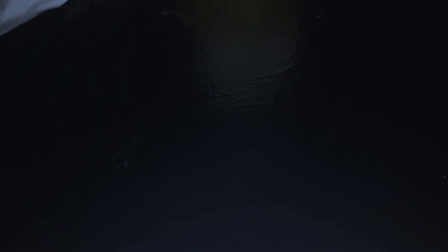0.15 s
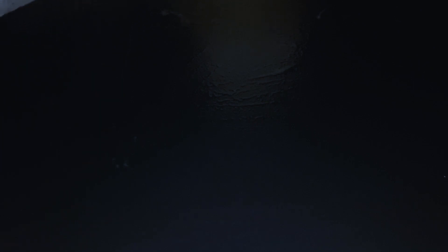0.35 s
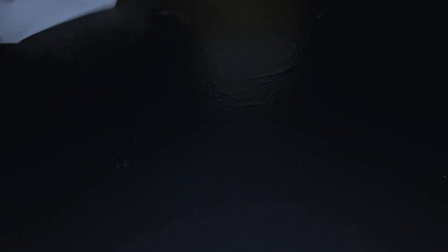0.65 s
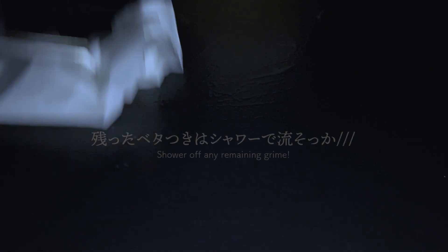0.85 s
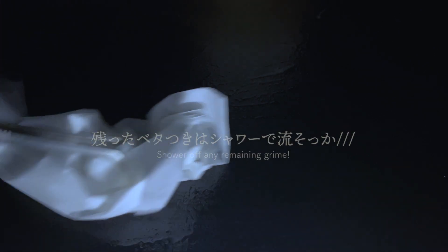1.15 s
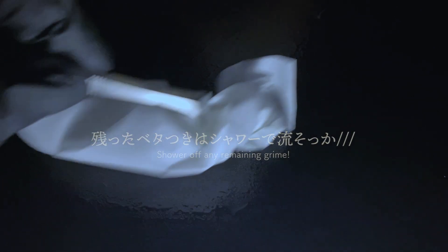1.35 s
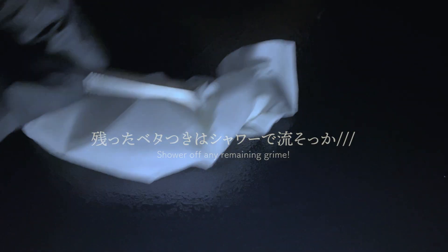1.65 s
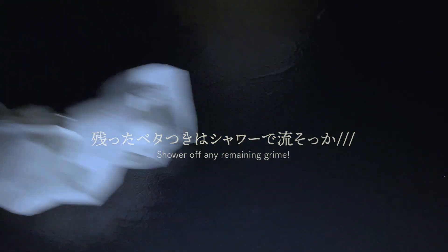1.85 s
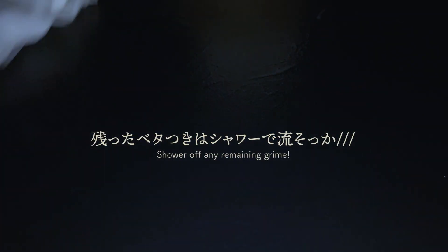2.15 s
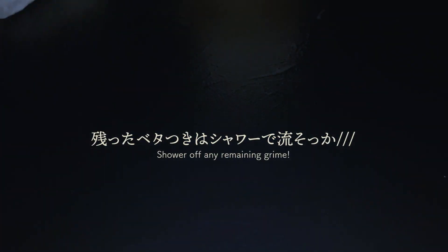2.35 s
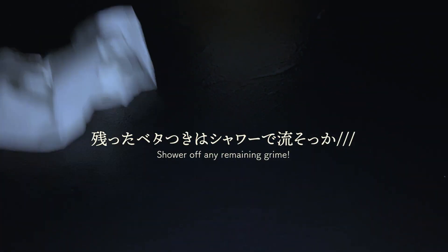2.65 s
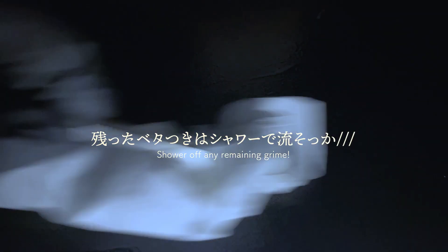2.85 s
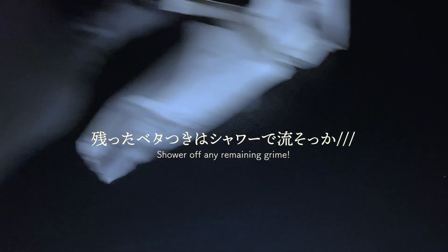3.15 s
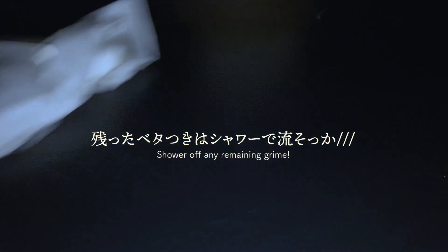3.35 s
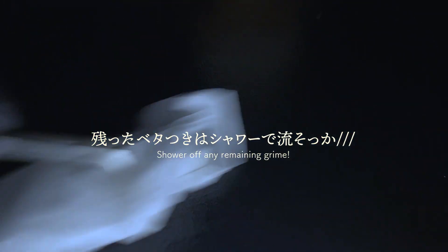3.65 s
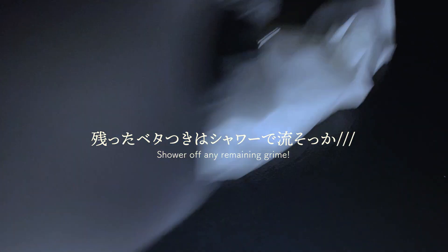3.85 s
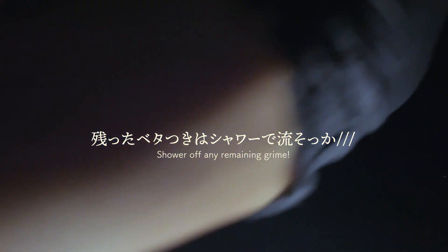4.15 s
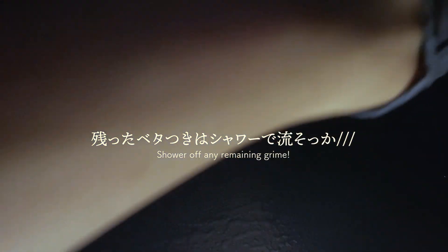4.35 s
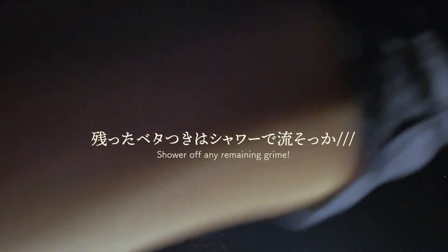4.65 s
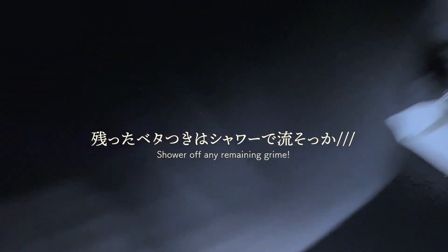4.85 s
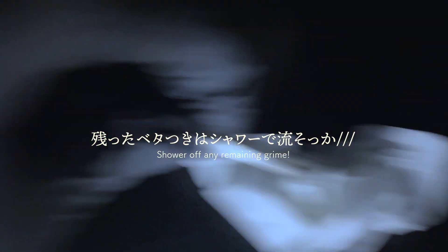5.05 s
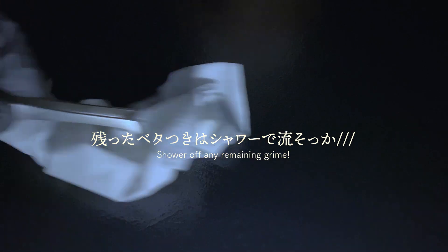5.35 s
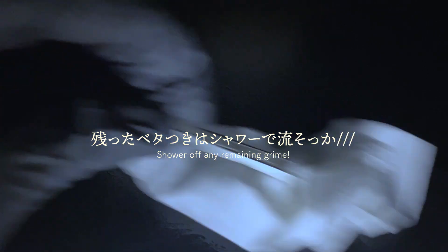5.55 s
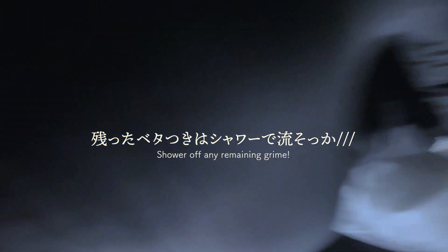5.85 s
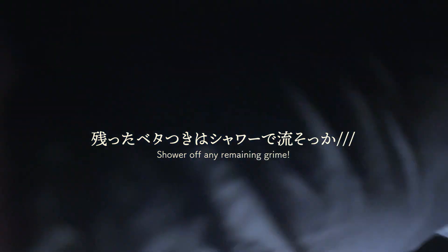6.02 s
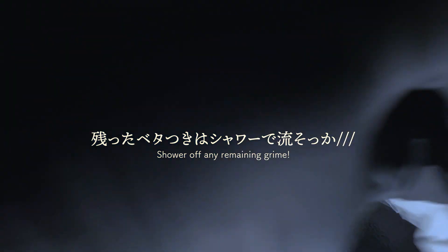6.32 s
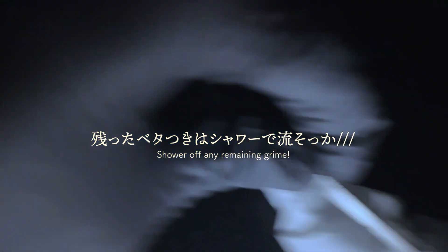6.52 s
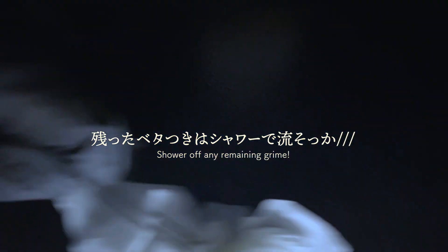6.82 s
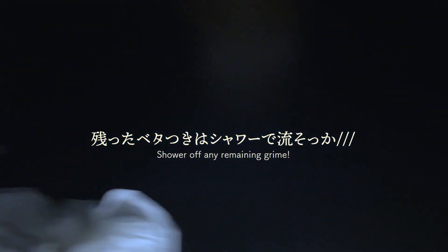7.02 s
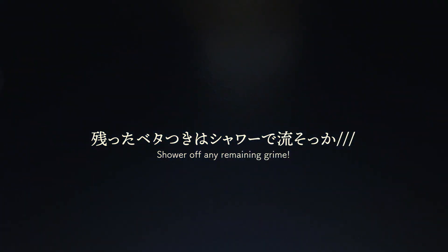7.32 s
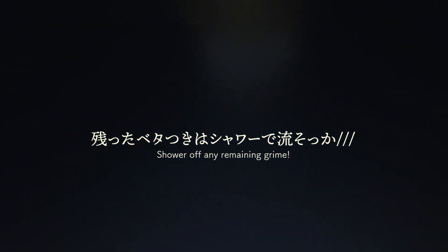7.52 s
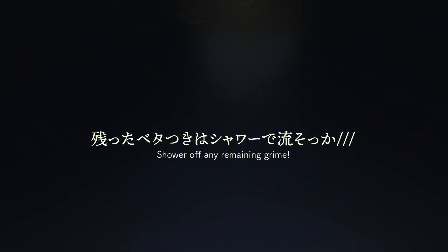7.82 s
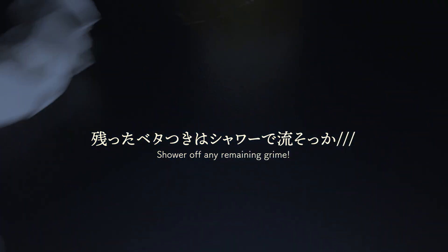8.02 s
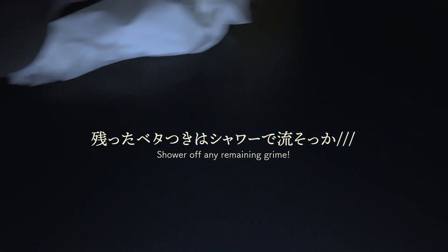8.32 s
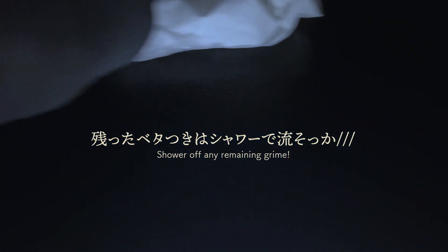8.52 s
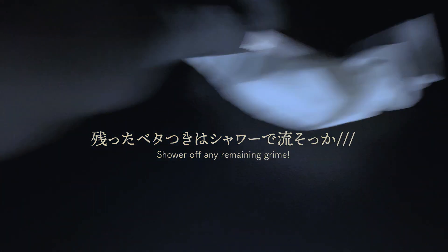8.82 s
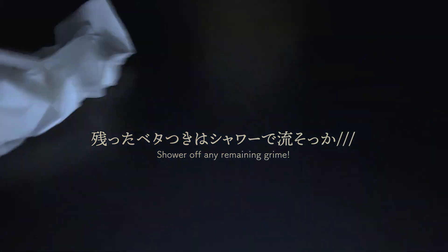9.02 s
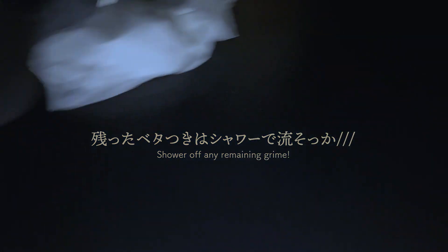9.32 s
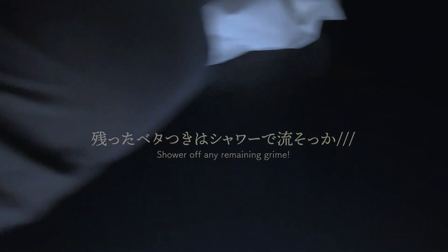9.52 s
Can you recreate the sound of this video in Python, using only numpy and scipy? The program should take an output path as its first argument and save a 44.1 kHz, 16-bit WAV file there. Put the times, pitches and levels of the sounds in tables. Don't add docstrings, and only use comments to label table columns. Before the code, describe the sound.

Close, rustling strokes of a stiff sheet hiss from left to right and back, dipping at turns, with little clicks and soft table thuds.

```python
import sys
import numpy as np
from scipy import signal
from scipy.fft import rfft, irfft, next_fast_len
from scipy.io import wavfile
from scipy.ndimage import uniform_filter1d, map_coordinates

SR = 44100
rng = np.random.default_rng(int(sys.argv[2]) if len(sys.argv) > 2 else 0)


def natural_amplitude(level_db):
    exponent = np.asarray(level_db, float) / 20
    return 10 ** exponent


def waveform_to_disk(signal):
    frames = np.transpose(np.atleast_2d(signal))
    scaled = np.clip(frames, -1, 1) * 32767
    samples = np.round(scaled).astype(np.int16)
    wavfile.write(sys.argv[1], SR, samples)


N = 426447

# start_s [s], speed_db [dB]
SPEED_CURVE = [(0, -33.5), (.3, -37), (.62, -33), (.91, -36.5), (1.2, -38), (1.75, -36.5), (2.05, -36.5),
               (2.5, -36.5), (2.75, -40), (3.3, -40.5), (3.85, -41), (4.45, -34.5), (5.1, -40),
               (5.8, -38.5), (6.7, -43.5), (7.9, -41), (8.5, -43), (9.67, -40.5)]
# start_s [s], weight_db [dB]
WEIGHT_CURVE = [(0, 0), (.4, 1.5), (.7, 3), (1.05, -1), (1.3, 0), (1.86, 1.5), (2.3, -2.5), (2.55, 2),
                (3.2, 4), (3.5, 1), (3.75, 5), (4.28, -4.5), (5.15, 0.5), (5.9, -3.5), (7.3, -7.5),
                (8.55, -4), (8.81, 4), (9.05, -6.5)]
# peak_s [s], swell_db [dB], approach_s [s], recovery_s [s]
HAND_LEANS = [
    (.46, 5.5, 0.092, 0.027),
    (.72, 7.5, 0.16, 0.14),
    (2.63, 8, 0.22, 0.16),
    (3.42, 2, .1, .06),
    (4.42, 5.5, 0.18, 0.16),
    (5.04, 6, 0.033, 0.016),
    (7.48, 3.5, 0.045, .03),
    (2.05, 4.5, 0.14, 0.064),
]


def unit(x):
    return x / np.sqrt(np.mean(x ** 2, axis=-1, keepdims=True) + 1e-20)


def curves(rows):
    s, *cols = np.transpose(rows)
    return [np.interp(np.arange(N) / SR, s, c) for c in cols]


def swells(table):
    t = np.arange(N) / SR
    total_db = np.zeros(N)
    for s, db, before, after in table:
        approach = np.clip(1 - (s - t) / before, 0, 1) ** 0.91
        recovery = np.exp(-np.abs(t - s) / after)
        total_db += db * np.where(t < s, approach, recovery)
    return total_db


def wobble(rate):
    knots = rng.standard_normal(int(N * rate / SR) + 4)
    return map_coordinates(knots, [np.arange(N) * rate / SR])


def filtered(x, response):
    m = next_fast_len(N + 8192)
    return irfft(rfft(x, m) * response(np.fft.rfftfreq(m, 1 / SR)), m)[..., :N]


def coloured(x, points):
    f, db = np.transpose(points)
    return unit(filtered(x, lambda hz: natural_amplitude(np.interp(np.log(hz + 1), np.log(f + 1), db))))


def tilted(x, points, tilt_db, bright):
    dull = coloured(x, [(f, db - tilt_db * np.log2(f)) for f, db in points])
    keen = coloured(x, [(f, db + tilt_db * np.log2(f)) for f, db in points])
    bright = np.clip(bright, 0, 1)
    return (1 - bright) * dull + bright * keen


def ears(db, pan_db):
    ratio = natural_amplitude(pan_db)
    return 2 * natural_amplitude(db) * np.array([ratio, 1 + 0 * ratio]) / np.sqrt(1 + ratio ** 2)


def pair(alike):
    common, *own = rng.standard_normal((3, N))
    return np.sqrt(alike) * common + np.sqrt(1 - alike) * np.array(own)


def room_rumble():
    # pitch_hz [Hz], level_db [dB]
    rumble_colour = [(18, -60), (30, -23), (47, -0.5), (57, -10.5), (70, -2), (95, -9.5), (112, -15),
                     (150, -9), (172, -12), (200, -8), (270, -19.5), (400, -120)]
    side_db = np.array([[-2.2], [2.2]])
    return natural_amplitude(-57.5 + wobble(4.4)) * natural_amplitude(side_db) * coloured(pair(0.95), rumble_colour)


def room_hum():
    pitch_hz = 47.9 + 1.85 * wobble(5)
    level_db = -61.5 + 2.1 * wobble(3.3) + np.array([[-2.2], [2.2]])
    return natural_amplitude(level_db) * np.sin(2 * np.pi * np.cumsum(pitch_hz) / SR)


def room_air():
    # pitch_hz [Hz], level_db [dB]
    air_colour = [(300, -120), (700, -12), (3000, 0.5), (8000, -14), (16000, -24)]
    return natural_amplitude(-56.5) * coloured(pair(0.066), air_colour)


def table_thrum():
    # pitch_hz [Hz], level_db [dB]
    thrum_colour = [(60, -120), (110, -6), (170, -1), (230, -3.5), (300, -1), (450, -4.5), (800, -36),
                    (1500, -120)]
    speed_db, weight_db = curves(SPEED_CURVE)[0], curves(WEIGHT_CURVE)[0]
    level_db = -59.5 + 0.21 * (speed_db - speed_db.mean()) + 0.26 * weight_db + swells(HAND_LEANS)
    side_db = np.array([[-.6], [.6]])
    return natural_amplitude(level_db) * natural_amplitude(side_db) * coloured(pair(0.36), thrum_colour)


def knocks(table, cycles, crack, gain_db):
    out, t = np.zeros((2, N + SR)), np.arange(SR // 10) / SR
    for s, db, pan_db, hz in table:
        fade = np.exp(-t * hz / cycles) * (1 - np.exp(-t * hz * 2.5))
        grit = unit(uniform_filter1d(rng.standard_normal((2, len(t))), 1 + int(SR / hz / 2)))
        ring = fade * (1 + crack * grit) * np.sin(2 * np.pi * hz * t + crack * grit)
        ring = ring / np.abs(ring).max(axis=1, keepdims=True)
        ring = ring * natural_amplitude(db + gain_db + np.minimum(0, [[pan_db], [-pan_db]]))
        for ear, way in enumerate((-1, 1)):
            late_s = max(way * pan_db, 0) * 3e-5
            start = round((s - .75 / hz + late_s) * SR)
            out[ear, start:][:len(t)] += ring[ear]
    lowest_hz = min(row[3] for row in table) / 2
    return filtered(out[:, :N], lambda f: (1j * f / (lowest_hz + 1j * f)) ** 2)


def table_bumps():
    # peak_s [s], level_db [dB], left_right_db [dB], pitch_hz [Hz]
    bumps = [
        (2.545, -42, 7, 370),
        (2.61, -39, 2, 217),
        (2.675, -43, 2, 178),
        (2.75, -55, 2, 171),
        (4.5, -45, -8, 264),
        (4.56, -38, -12, 164),
        (5.04, -49, -1, 202),
        (5.045, -43, 3, 378),
    ]
    return knocks(bumps, cycles=4.5, crack=0.43, gain_db=2.5)


def fold_snaps():
    # peak_s [s], level_db [dB], left_right_db [dB], pitch_hz [Hz]
    snaps = [(.4048, -13, 15, 5030), (.4072, -14, 12, 4500), (.6075, -16, 11, 4200), (.8812, -18, 6, 3900),
             (1.4154, -27, -4, 4500), (1.5424, -28, -6, 4800), (1.5705, -28, -1, 4800),
             (1.651, -22, 9, 5000), (1.6891, -21, 9, 4200), (1.7, -20, 6, 4500), (1.7855, -18, 3, 5600),
             (1.8184, -18, 2, 6300), (2.0113, -18, 17, 4800), (2.0354, -18, 14, 4600),
             (2.0859, -17, 18, 4800), (2.1991, -18, 19, 5000), (2.3553, -18, 13, 4400),
             (3.2222, -22, 8, 4500), (4.3567, -13, -25, 4800), (4.3735, -17, -20, 4400),
             (4.4166, -14, -22, 4830), (4.428, -18, -20, 4700), (4.549, -17, -10, 5240),
             (5.2735, -31, 0, 5300), (5.7505, -21, -11, 4400), (5.788, -21, -11, 5090),
             (6.056, -23, -8, 5240), (6.0662, -21, -12, 5000), (6.078, -20, -14, 4300),
             (6.3796, -21, -12, 4940), (8.617, -24, 2, 6200), (8.7955, -31, -4, 4400),
             (8.8522, -31, -5, 4500), (8.9542, -29, 9, 4800), (9.136, -28, 3, 6200),
             (9.6546, -26, -11, 4800)]
    # peak_s [s], level_db [dB], left_right_db [dB], pitch_hz [Hz]
    flicks = [(.2202, -24, 19, 9250), (.2293, -25, 20, 9000), (.2585, -27, 15, 9000),
              (.2864, -29, 18, 9000), (.3336, -22, 22, 9000), (.9016, -26, 9, 9300), (1.0365, -30, 2, 9250),
              (1.6358, -31, 4, 9300), (1.7855, -29, 7, 9700), (1.8184, -27, 8, 8500),
              (2.3134, -30, 20, 9000), (4.4254, -25, -25, 11900), (4.5492, -25, -8, 10500),
              (4.6109, -32, 2, 9500), (5.0331, -31, -2, 9350), (5.2705, -35, 18, 9610),
              (5.9526, -32, -3, 9240), (6.0009, -31, -13, 9300), (6.0653, -33, -2, 9260),
              (6.3796, -28, -16, 9300), (7.4542, -26, 12, 9300), (8.8512, -38, 5, 9500),
              (8.939, -35, 13, 9500), (8.9991, -34, 16, 10000)]
    # peak_s [s], level_db [dB], left_right_db [dB], pitch_hz [Hz]
    ticks = [(.1127, -17, 16, 2900), (.2045, -15, 22, 3000), (.2795, -22, 14, 1900),
             (1.3519, -25, -5, 3300), (1.6288, -25, 4, 3200), (1.819, -21, 5, 3000),
             (2.0213, -23, 10, 3250), (2.1107, -20, 16, 3100), (2.371, -20, 10, 2720), (2.79, -27, 5, 2800),
             (2.9676, -19, -7, 3300), (3.2227, -25, 9, 3000), (4.3569, -23, -20, 3000),
             (5.3707, -25, -8, 3600), (5.3732, -28, 0, 2600), (6.3798, -27, -14, 2900),
             (8.7952, -29, -10, 2900), (8.8351, -32, -8, 2800), (9.1383, -33, 4, 3000)]
    # peak_s [s], level_db [dB], left_right_db [dB], pitch_hz [Hz]
    slaps = [(1.0365, -32, 2, 1500), (1.6873, -29, 3, 1500), (4.4254, -27, -18, 1710),
             (5.3723, -27, -7, 1400), (5.375, -31, -7, 750), (5.7889, -32, -9, 1500),
             (6.3007, -27, -17, 1150), (6.3796, -35, -9, 1510), (7.27, -47, 0, 910),
             (8.4351, -36, -6, 1800), (8.7973, -40, -2, 1400), (9.0113, -40, 10, 1110),
             (9.1023, -46, 1, 1110)]
    thin = knocks(snaps, cycles=3.5, crack=.22, gain_db=1.5) + knocks(flicks, cycles=5, crack=.4, gain_db=1.5)
    thick = knocks(ticks, cycles=2.5, crack=.35, gain_db=2.5) + knocks(slaps, cycles=2.2, crack=.8, gain_db=3)
    return thin + thick


def fibres(pan_db, spread_db, sparse, burst_s, alike, lag_per_db):
    size_db = spread_db * np.minimum(rng.exponential(size=(3, N)), 3.6)
    starts = (rng.random((3, N)) < .006) * natural_amplitude(size_db)
    bursts = signal.lfilter([1], [1, -np.exp(-1 / (burst_s * SR))], starts)
    slips = unit(rng.standard_normal((3, N)) * (1 + sparse * unit(bursts)))
    lag = np.clip(lag_per_db * pan_db, -18, 18)
    n = np.arange(N)
    common = np.array([np.interp(n + way * lag, n, slips[0]) for way in (1, -1)])
    return np.sqrt(alike) * unit(common) + np.sqrt(1 - alike) * slips[1:]


def patchy(x, patchy_db, bins, frames):
    z = signal.stft(x, nperseg=512)[2]
    field = rng.standard_normal(z.shape)
    for _ in range(2):
        field = uniform_filter1d(uniform_filter1d(field, bins, axis=1), frames, axis=2)
    return signal.istft(z * natural_amplitude(patchy_db * field / field.std()), nperseg=512)[1][:, :N]


def creased(x):
    quick = patchy(x, 0.85, bins=5, frames=9)
    return patchy(quick, 0.34, bins=3, frames=70)


def fibre_slips(pan_db):
    fast = np.array([wobble(150), wobble(150)])
    tremble = natural_amplitude(.45 * wobble(12) + .7 * wobble(40) + .4 * fast)
    coarse = fibres(pan_db, spread_db=2.5, sparse=0.34, burst_s=0.00048, alike=0.17, lag_per_db=2.08)
    fine = fibres(pan_db, spread_db=7.5, sparse=0.15, burst_s=0.00032, alike=0.089, lag_per_db=2.5)
    return creased(tremble * coarse), creased(tremble * fine)


def hem_scuff(coarse, level_db, pan_db):
    # pitch_hz [Hz], level_db [dB]
    scuff_colour = [(250, -120), (420, -19), (650, -1), (900, -2), (1150, -4), (1600, -9.5), (2500, -120)]
    return ears(level_db - 21, pan_db) * coloured(coarse, scuff_colour)


def sheet_drag(coarse, level_db, pan_db, bright):
    # pitch_hz [Hz], level_db [dB]
    drag_colour = [(600, -120), (950, -21.5), (1300, -6), (1800, 2.5), (2300, 1), (2800, 0.5), (3400, -8),
                   (4500, -44), (6000, -120)]
    return ears(level_db - 8, pan_db) * tilted(coarse, drag_colour, 6.5, bright)


def ear_hiss(coarse, fine, level_db, pan_db, bright):
    # pitch_hz [Hz], level_db [dB]
    hiss_colour = [(1500, -120), (2400, -27.5), (3250, -8.5), (3650, -1), (4050, 1), (4900, 1),
                   (6000, -1.5), (7200, -13), (9000, -41), (12000, -120)]
    return ears(level_db, pan_db) * tilted(0.62 * coarse + 0.78 * fine, hiss_colour, 8.5, bright)


def sheet_sheen(fine, level_db, pan_db):
    # pitch_hz [Hz], level_db [dB]
    sheen_colour = [(4500, -120), (6500, -6), (8000, -3), (9500, -2.5), (11000, -8), (12500, -16),
                    (16000, -120)]
    return ears(level_db - 9.5, pan_db) * coloured(fine, sheen_colour)


def fold_glint(fine, level_db, pan_db):
    # pitch_hz [Hz], level_db [dB]
    glint_colour = [(8000, -120), (11000, -12), (12300, -3.5), (14000, -3), (15500, -9.5), (16000, -14),
                    (18000, -120)]
    # peak_s [s], crispness_db [dB], approach_s [s], recovery_s [s]
    crackles = [
        (1.07, -6, .04, .05),
        (1.25, 5, .1, .06),
        (2.3, 0, .05, .05),
        (7.46, 4, .1, .03),
        (7.6, -7, .04, .1),
        (8.4, -7, .12, .12),
        (8.73, 5, .15, .012),
        (8.8, -3, .03, .08),
        (8.95, 4, .015, .04),
    ]
    return ears(level_db - 20 + swells(crackles), 2.1 * pan_db) * coloured(fine, glint_colour)


def table_bounce(x):
    # start_s [s], left_delay_ms [ms], left_share [0-1], right_delay_ms [ms], right_share [0-1]
    bounce = [(0, 0.57, 0.21, 0.88, .15), (.55, 0.6, 0, 1.5, 0.00056), (1, 0.49, 0.19, 0.75, 0.21),
              (1.45, 0.59, 0, 0.71, 0.11), (1.7, 0.46, 0, 0.74, 0.2), (2.1, 0.61, 0, 0.95, 0.19),
              (2.35, 0.53, 0.26, 0.92, 0.081), (2.8, 0.56, 0.016, 0.76, 0.17),
              (3.3, 0.72, 0.18, 0.63, 0.042), (3.5, 0.78, 0.15, 0.73, 0.22), (3.9, 0.66, 0.4, 0.94, 0.14),
              (4.25, .78, .3, 0.84, 0), (4.4, 0.63, 0.045, 0.83, 0), (4.75, 0.76, 0.51, 1.2, 0.099),
              (5.1, 0.56, 0.13, 0.67, 0.2), (5.3, 0.56, .25, 0.96, 0), (5.9, .7, 0.36, .72, 0),
              (6.4, 0.63, .3, .7, 0), (6.62, 0.54, 0, .76, .2), (6.7, .76, .35, 1.2, 0.0024),
              (6.85, 0.78, .5, 1.09, 0.37), (7.15, 0.7, 0.41, 1.11, 0.35), (7.4, 0.63, 0.36, .62, 0.22),
              (7.5, 0.6, .1, .85, 0.01), (7.7, 0.62, 0.014, 1.6, .25), (8.1, 0.64, 0.18, 1.3, 0.097),
              (8.55, 0.75, 0.46, .85, 0.15), (8.85, 0.6, 0, .8, 0), (9.05, 0.47, 0.21, .8, .05),
              (9.3, 0.76, 0.15, .75, 0), (9.67, 0.63, .4, 0.97, .1)]
    left_ms, left, right_ms, right = curves(bounce)
    late = np.arange(N) - SR * np.array([left_ms, right_ms]) / 1000
    share = np.clip([left, right], 0, .7)
    copy = np.array([map_coordinates(ear, [at], order=3) for ear, at in zip(x, late)])
    return (x + share * copy) / np.sqrt(1 + share ** 2)


def ear_notch(x):
    # start_s [s], centre_hz [Hz], depth_db [dB]
    notch_path = [
        (3.6, 10500, -2),
        (3.85, 10500, -5),
        (4.1, 10000, -2),
        (4.25, 8500, -2),
        (4.4, 8800, -12),
        (4.48, 10000, -13),
        (4.65, 10500, -6),
    ]
    hz, t, z = signal.stft(x[1], SR, nperseg=512)
    s, centre_hz, depth_db = np.transpose(notch_path)
    off_centre = (hz[:, None] - np.interp(t, s, centre_hz)) / 900
    dip_db = np.interp(t, s, depth_db) * np.exp(-off_centre ** 2)
    return np.array([x[0], signal.istft(z * natural_amplitude(dip_db), SR, nperseg=512)[1][:N]])


def sheet_sweep():
    # start_s [s], left_right_db [dB]
    place = [(0, 9.5), (.62, 9.5), (.8, 0.5), (1.8, 1), (2.05, 10.5), (2.4, 10.5), (2.85, -1.5), (3.35, 6),
             (3.8, -4), (4.44, -28), (5.17, 1), (5.5, -1), (6.0, -19.5), (6.75, -3), (7.7, 11), (8.7, -6.5),
             (9.05, 5.5), (9.67, -10.5)]
    # peak_s [s], left_right_db [dB], approach_s [s], recovery_s [s]
    swerves = [
        (2.26, 2, .1, .05),
        (2.99, -7, 0.083, 0.12),
        (3.23, 2, 0.03, .02),
        (4.04, 2.5, .15, 0.086),
        (4.44, -7, .1, 0.046),
        (5.68, -1, .1, .1),
        (6.06, 9, .03, 0.036),
        (7.41, -4, 0.17, 0.044),
        (8.89, 3, .1, 0.045),
    ]
    # peak_s [s], change_db [dB], approach_s [s], recovery_s [s]
    turns = [(.349, -8, 0.057, 0.0049), (.4, 4, 0.095, 0.12), (.52, 0, 0.095, 0.044),
             (.73, 0, 0.057, 0.044), (3.89, -1, 0.053, 0.033), (4.85, 0.5, 0.094, 0.032),
             (5.54, -1.5, 0.035, 0.044), (6.35, 2.5, 0.089, 0.1), (6.93, -0.5, 0.053, 0.1),
             (1.03, -4, 0.066, 0.26), (1.5, -6, 0.15, 0.19), (1.62, -3.5, 0.12, 0.0089),
             (1.69, 1.5, 0.036, .03), (1.75, -2, .04, 0.014), (2.33, -5.5, 0.12, 0.012),
             (2.345, 3, .006, 0.24), (2.99, 3, 0.1, 0.025), (3.04, -3, 0.015, 0.17), (3.39, 1.5, 0.1, .08),
             (3.58, -1.5, 0.055, 0.043), (3.72, 1.5, 0.11, 0.08), (5.242, -19, 0.0086, 0.031),
             (5.262, -11.5, 0.1, 0.011), (5.3, -5.5, 0.024, 0.13), (6.05, -3.5, 0.077, .004),
             (6.06, 5.5, .006, 0.045), (6.25, 1, 0.086, 0.034), (7.24, 2, 0.1, 0.062),
             (7.51, -0.5, 0.072, 0.017), (7.58, -15, 0.091, 0.062), (7.7, -5, 0.1, 0.029),
             (8.72, 0.5, 0.11, 0.011), (8.755, -6.5, 0.0099, 0.1), (8.905, -12, 0.089, 0.021),
             (9.02, -5.5, 0.063, 0.051), (9.21, -2.5, 0.093, 0.19), (7.542, -9, .015, .025)]
    # peak_s [s], weight_db [dB], approach_s [s], recovery_s [s]
    presses = [(1.22, 3.5, .08, 0.066), (3.25, -0.5, 0.081, .05), (5.06, 3.5, 0.065, .06),
               (.22, 1.5, .1, 0.094), (.5, -0.5, .08, .08), (.78, -1, .08, 0.055), (1.02, 0, .05, .05),
               (3.58, 3.5, .01, 0.081), (.35, 0, 0.062, .02), (1.48, 2, .1, 0.042),
               (2.02, -3.5, 0.083, 0.031), (2.31, 4.5, 0.037, 0.0077), (2.72, -1.5, 0.14, 0.12),
               (2.91, 2, 0.099, 0.034), (3.39, -4, 0.12, 0.085), (3.49, -3, 0.052, 0.045),
               (4.44, 1, 0.14, 0.046), (4.74, 1, 0.47, 0.086), (5.7, 1, 0.026, .03), (5.8, 2, 0.026, 0.046),
               (6.3, 0, 0.048, 0.018), (6.7, 6.5, 0.18, 0.98), (7.08, -1, 0.1, .08),
               (7.38, -2, 0.16, 0.034), (7.48, 5, 0.047, 0.027), (8.3, 0, 0.19, 0.089),
               (9.21, 3, 0.11, 0.19)]
    # start_s [s], opening_db [dB], crispness_db [dB]
    facing = [(0, -1, 4.5), (.38, -6, 5), (0.601, -3, 6), (.91, 4, 0), (1.1, 0.5, -3), (1.45, -5.5, -11),
              (1.8, 4, -1), (2.38, -7, 2.5), (2.72, 3.5, -1), (3.12, -2.5, 0), (3.56, 5, -1), (4.0, -4, 3),
              (4.42, -6.5, 0), (4.62, 1, -2), (6.3, 2, -4), (7.65, 3, 0), (8.4, 1.5, 1.5), (9.55, -3.5, -2)]
    # peak_s [s], opening_db [dB], approach_s [s], recovery_s [s]
    flips = [(.3, 0, .06, .03), (1.29, 3.5, 0.15, .02), (2.02, 2, 0.1, .05), (3.26, 1, .05, 0.056),
             (5.25, -4, .05, .03), (5.5, 0, .05, 0.12), (7.25, -2, .2, .15), (8.1, -2, 0.083, 0.042),
             (8.35, -6.5, 0.23, 0.36), (8.7, 3, 0.093, 0.034), (8.8, 0, 0.046, 0.036),
             (8.95, 7.5, .02, .03), (9.02, -1, .03, .02), (9.1, 5, .06, .05), (9.2, 2, .1, .1),
             (9.52, -3.5, 0.16, .1)]
    # start_s [s], drag_bright [0-1], hiss_bright [0-1], hem_slack_db [dB]
    taut = [(0, 0.63, .3, -2), (.25, 0.96, 0.27, -6), (.5, 0.5, 0.27, -7.5), (.75, 0.04, 0.57, -1),
            (1, 0.5, 0.34, 1), (1.5, 0.6, 0.4, 0), (2.05, 0.54, 0.3, 4.5), (2.4, 0.55, .6, -3),
            (3, 0.5, 0.33, 1.5), (3.4, 0.6, 0.45, 4), (3.75, 0.46, 0.2, -1.5), (4.4, 0.34, 0.47, -1.5),
            (5.2, 0.57, 0.34, 4), (5.9, .55, 0.48, 2), (6.5, 0.5, 0.66, 1.5), (6.85, 0.7, 0.53, -1.5),
            (7.3, 1, 0.4, 4), (7.7, 0.5, 0.43, 5), (8.45, 0.75, 0.44, 0), (8.7, 0.8, 0.86, 1),
            (8.8, 0.27, 0.1, 2.5), (9, 0.06, 0.3, 3.5), (9.67, 0.9, 0.65, 4.5)]

    speed_db, turn_db = curves(SPEED_CURVE)[0], swells(turns)
    pan_db = curves(place)[0] + swells(swerves)
    weight_db = curves(WEIGHT_CURVE)[0] + swells(presses)
    open_db, crisp_db = curves(facing)
    open_db = open_db + swells(flips)
    drag_bright, hiss_bright, slack_db = curves(taut)
    low_db, high_db = speed_db + 0.88 * turn_db, speed_db + 0.78 * turn_db
    low_pan_db, high_pan_db = 0.7 * pan_db - 1, pan_db + 3

    coarse, fine = fibre_slips(pan_db)
    scuff_db = low_db + slack_db + 1.27 * weight_db + 0.62 * swells(HAND_LEANS)
    scuff = hem_scuff(coarse, scuff_db, low_pan_db)
    drag = sheet_drag(coarse, low_db + weight_db, low_pan_db, drag_bright)
    hiss = ear_hiss(coarse, fine, speed_db + turn_db, pan_db, hiss_bright)
    sheen = sheet_sheen(fine, high_db + open_db, high_pan_db)
    glint = fold_glint(fine, high_db + crisp_db, high_pan_db)
    return ear_notch(scuff + table_bounce(drag + hiss) + sheen + glint)


def scene():
    room = room_rumble() + room_hum() + room_air() + table_thrum()
    return room + table_bumps() + fold_snaps() + sheet_sweep()


def equaliser(f):
    hz, wide_hz, depth_db = 540, 260, -27
    off_centre = hz * hz - f * f
    notch = (off_centre + 1j * f * wide_hz * natural_amplitude(depth_db)) / (off_centre + 1j * f * wide_hz)
    return notch * (f < 15810)


def band_limit(x):
    return signal.sosfilt(signal.butter(12, 15880, fs=SR, output="sos"), x)


def record(dry):
    mix = filtered(dry, equaliser)
    return band_limit(mix)


dry = scene()
out = record(dry)
waveform_to_disk(out)
```